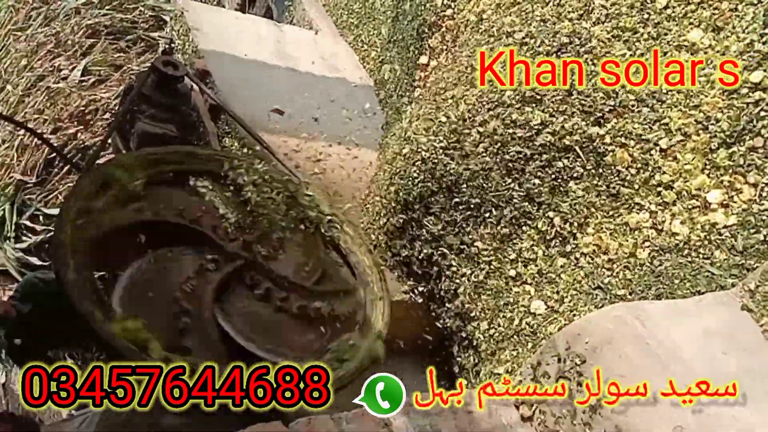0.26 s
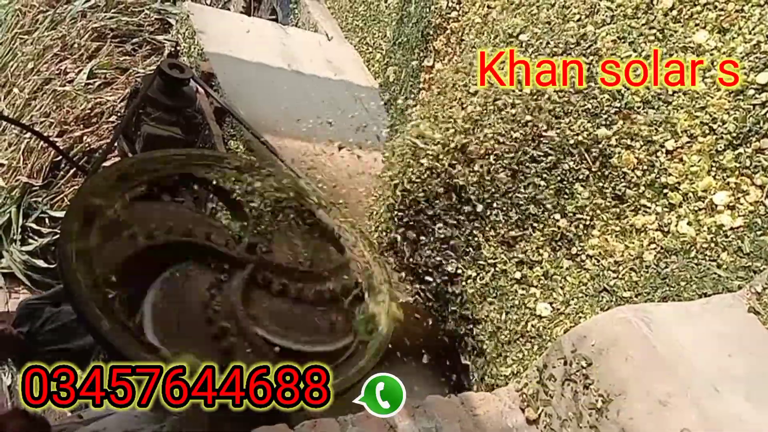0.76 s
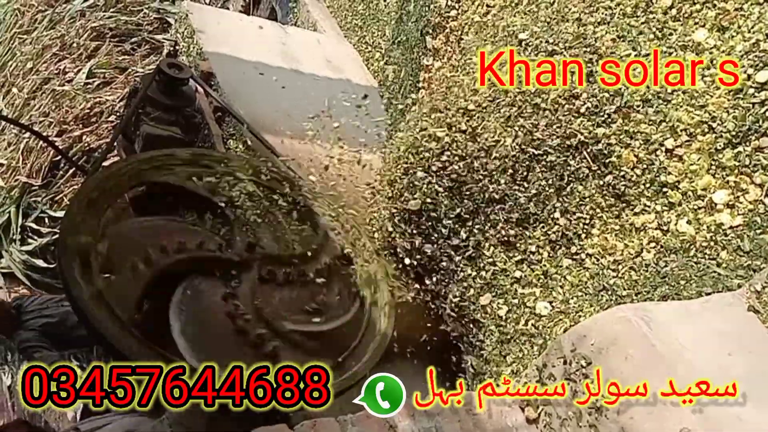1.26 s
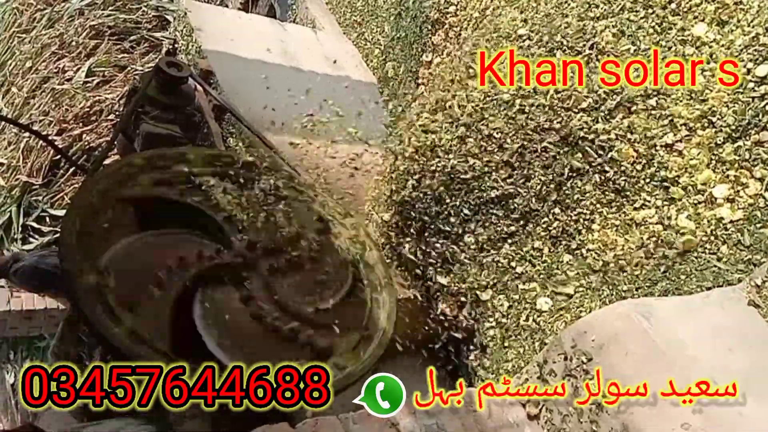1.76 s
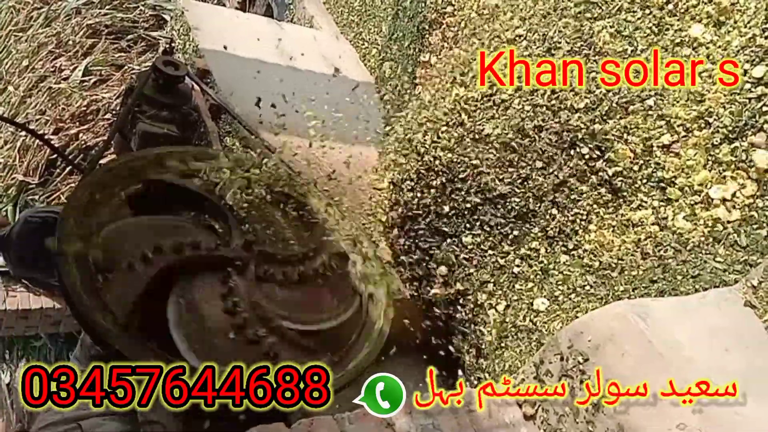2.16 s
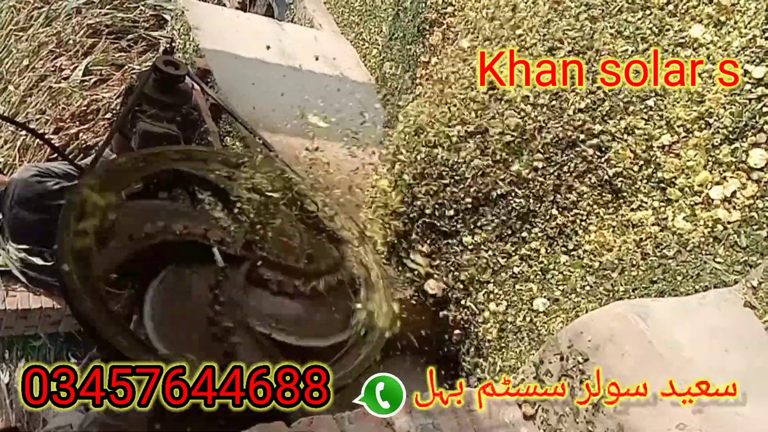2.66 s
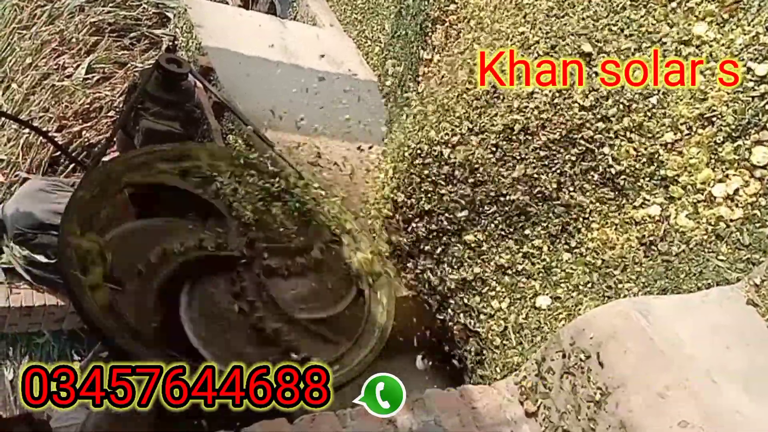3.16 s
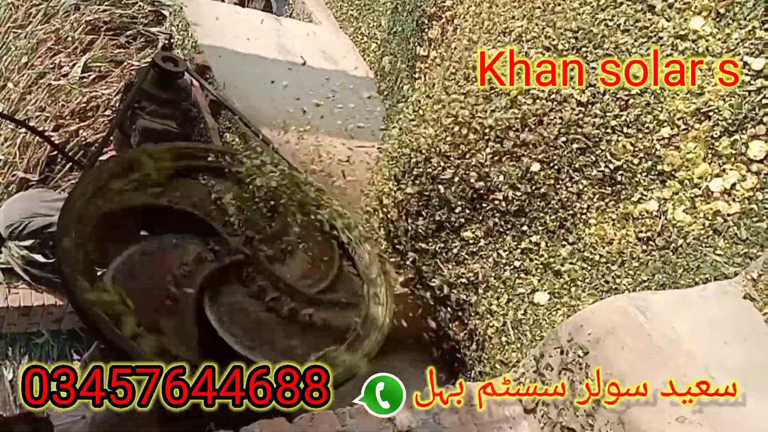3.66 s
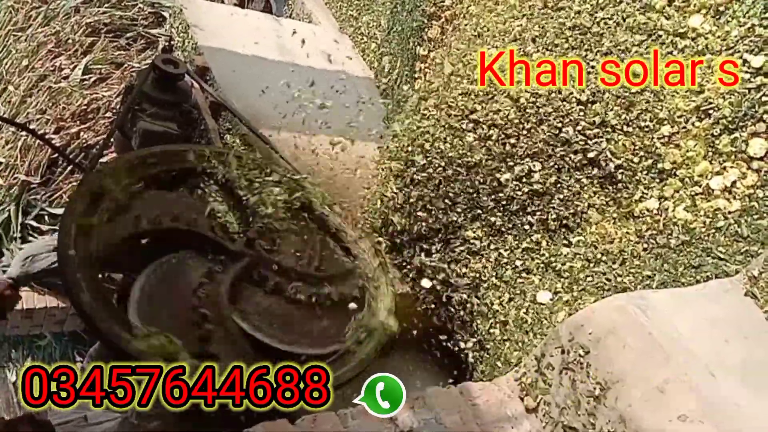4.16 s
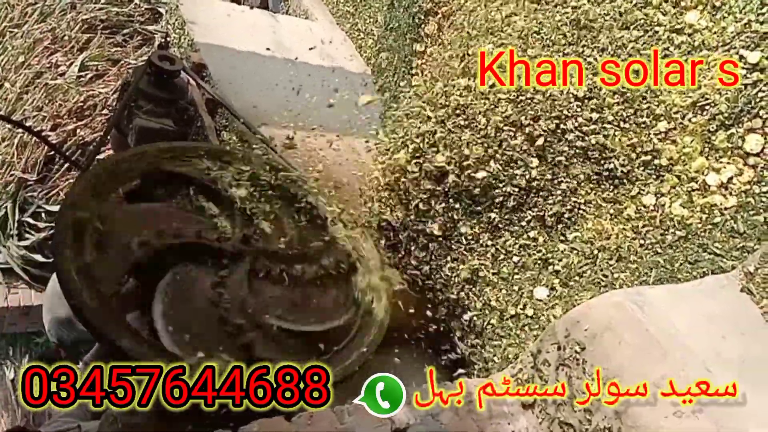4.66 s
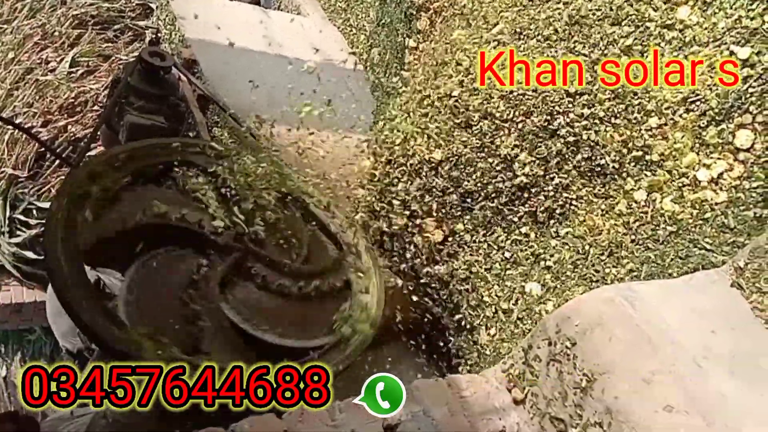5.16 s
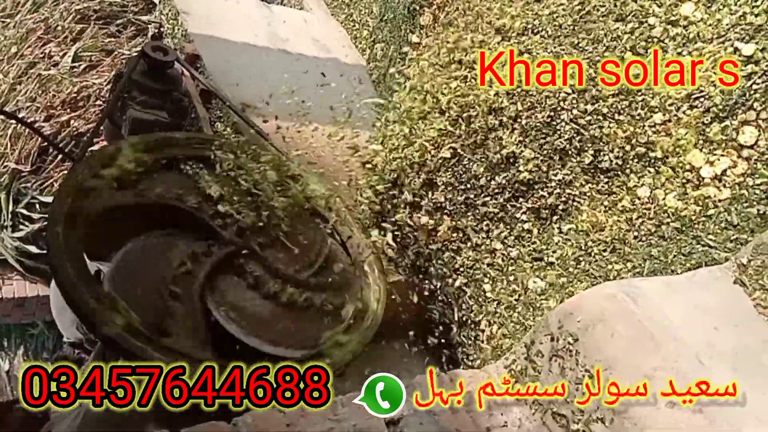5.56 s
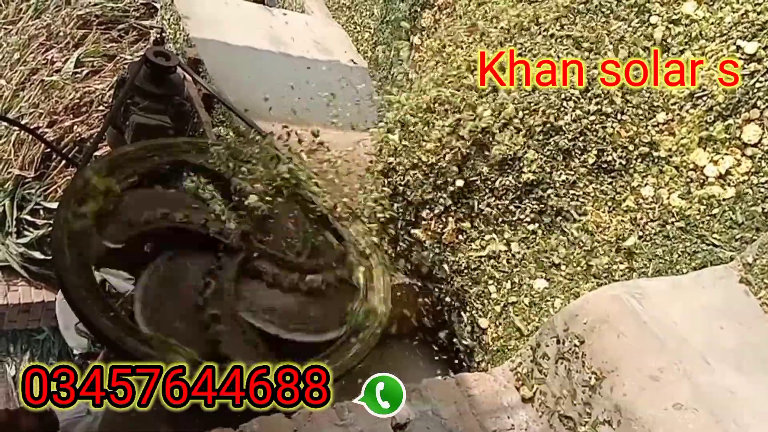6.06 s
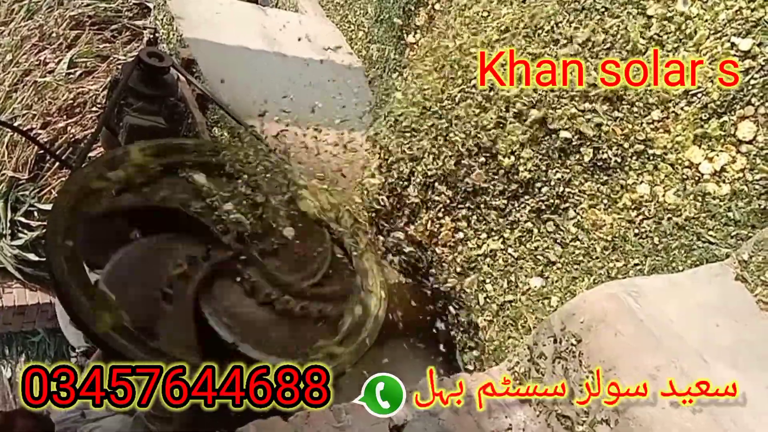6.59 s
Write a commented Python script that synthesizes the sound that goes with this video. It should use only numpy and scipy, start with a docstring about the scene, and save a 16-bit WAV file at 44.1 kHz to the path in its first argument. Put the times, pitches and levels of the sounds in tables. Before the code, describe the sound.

From 0 to about 6.8 seconds an electric chaff cutter runs without pause, heard from just above its flywheel in a farmyard. Four knives cut in turn, roughly fifteen strokes a second, making a fast chugging crunch: each stroke bites, tears through stalks with a bright hiss of leaves, then drops briefly. The strokes vary as the bundle packs tighter or looser, with fuller crunching around 1.4 to 2 seconds. Dull iron thumps cluster between 0.4 and 2 seconds, with isolated ones near 4 and 6.1. Thick stalks snap sharply around 1.3, 1.8, 2.3, 3.5, 4 and, most strongly, 6.2 seconds; small hollow pops flicker throughout. Underneath are steady low-mid rumble, loose gear rattle, pattering chips and a barely audible thin whine. Speed wavers only slightly. The cutting weakens at the very end, while the machine keeps running. Close, dry, compressed sound, with thinned bass.

```python
"""Chaff cutter in a farmyard

An electric chaff cutter chops green fodder, heard from just above its flywheel. Four knives shear the
bundle in turn, some fifteen cuts a second: fracture clicks, shaped by the force of each stroke, become
crunching stalks and hissing leaves; thick stems snap, hollow ones pop, and blows ring the modes of the
iron feed mouth. Chaff and loose gears patter over filtered noise and thin tones from the drive."""
import sys
import numpy as np
from scipy import signal
from scipy.fft import rfft, irfft, next_fast_len
from scipy.io import wavfile
from scipy.ndimage import uniform_filter1d

SR = 44100
rng = np.random.default_rng(int(sys.argv[2]) if len(sys.argv) > 2 else 0)


def inscribe(sig):
    """Save sig as 16-bit PCM at rate SR to the path in sys.argv[1].

    A 1-D sig is mono; a 2-D sig holds one channel per row.
    Samples are clipped to [-1, 1] before scaling.
    """
    pcm = np.round(np.clip(np.atleast_2d(sig).T, -1, 1) * 32767)
    wavfile.write(sys.argv[1], SR, pcm.astype(np.int16))


N = 301203
TIME = np.arange(N) / SR  # seconds
TOP_HZ = 15520  # cutoff of the final low-pass filter


def undb(db):
    """Logarithmic level: decibels to amplitude gain."""
    return 10 ** (np.asarray(db) / 20)


def unit(x):
    """Normalisation: scale to rms 1."""
    return x / np.sqrt(np.mean(x ** 2))


def add(out, s, x):
    """Superposition: mix x into out from time s in seconds."""
    i = max(0, int(s * SR))
    out[i:i + len(x)] += x[:max(0, N - i)]


def curves(table, at):
    """Linear interpolation: the columns of a curve table at the given times."""
    s, *columns = np.transpose(table)
    return np.array([np.interp(at, s, column) for column in columns])


def flutter(rate, depth_db):
    """Random amplitude modulation: a gain of rms 1 drifting to a new random level rate times a second."""
    levels = rng.standard_normal(N // 16)
    wander = np.interp(TIME * rate, np.arange(len(levels)), levels)
    return unit(undb(depth_db * wander))


def clicks(rate, spread_db):
    """Random impulse process: tiny fractures, rate a second, of either sign and uneven size, at rms 1."""
    happens = rng.random(N) < rate / SR
    size = undb(spread_db * np.clip(rng.standard_normal(N), -2, 2))
    return unit(happens * size * rng.choice([-1, 1], N))


# Rings of the steel knives and their guard.
# Each row: centre in Hz, width in Hz at half the lift, lift in dB.
STEEL_RINGS = [(900, 158, 6.5), (1408, 330, 8.5), (2095, 93, 7), (2590, 120, 6), (2990, 130, 3.5),
               (3563, 100, 3.5), (12800, 460, 3)]


def colour(x, points, rings, size=4096):
    """Minimum-phase filtering: a causal response of unit power from a spectrum with resonant humps."""
    hz = np.maximum(np.fft.rfftfreq(size, 1 / SR), 1)
    at, db = np.transpose(points)
    db = np.interp(np.log(hz), np.log(at), db)
    for centre, width, lift in rings:
        db = db + lift / (1 + (2 * (hz - centre) / width) ** 2)
    # folding the cepstrum onto positive time makes the filter causal
    cepstrum = irfft(np.log(undb(db)))
    cepstrum[1:size // 2] *= 2
    cepstrum[size // 2 + 1:] = 0
    response = np.exp(rfft(cepstrum))
    power = np.mean(np.abs(response) ** 2 * (hz < TOP_HZ))
    return signal.fftconvolve(x, irfft(response) / np.sqrt(power))[:N]


def ring(x, modes):
    """Modal synthesis: damped cosines, of unit energy together, excited by x."""
    t = TIME[:SR // 10]
    response = 0
    for hz, width, db in modes:
        # a narrower mode decays more slowly
        decay = np.exp(-np.pi * width * t)
        response = response + undb(db) * width * decay * np.cos(2 * np.pi * hz * t)
    return signal.fftconvolve(x, response / np.sqrt(np.sum(response ** 2)))[:N]


def dapple(x, rate, depth_db, count=9):
    """Independent band modulation: half-octave bands swell and fade on their own."""
    length = next_fast_len(N)
    spectrum = rfft(x, length)
    hz = np.maximum(np.fft.rfftfreq(length, 1 / SR), 1)
    place = np.clip(2 * np.log2(hz / 700), 0, count - 1)
    out = np.zeros(N)
    for k in range(count):
        share = np.maximum(0, 1 - np.abs(place - k))
        band = irfft(spectrum * share, length)[:N]
        out += band * flutter(rate, depth_db)
    return out


# Spectrum of belt, bearings and stirred air.
# Each row: frequency in Hz, relative level in dB per Hz.
DRIVE_SPECTRUM = [(22, -6), (58, -21), (90, -9.5), (145, -0.5), (200, -4.5), (400, 2), (750, -5.5),
                  (1400, -11), (3000, -26), (8000, -16.5)]
# Thin tones of the electric drive. Each row: frequency in Hz, rms level in dB.
WHINE_TONES = [(7806, -50.5), (7935, -50)]


def drive(load, steady_db=-38, loaded_db=-45):
    """Load-modulated noise: belt, bearings and air rumble harder during a cut; the motor whines faintly."""
    effort = undb(steady_db) + undb(loaded_db) * unit(load)
    noise = rng.standard_normal(N) * effort * flutter(rate=43, depth_db=1.0)
    rumble = colour(noise, DRIVE_SPECTRUM, STEEL_RINGS)
    whine = np.zeros(N)
    for hz, db in WHINE_TONES:
        tone = unit(np.sin(2 * np.pi * hz * TIME))
        whine += undb(db) * tone * flutter(rate=12, depth_db=2.5)
    return rumble + whine


# Spectrum of sliced leaves and skins, shared by the falling chips.
# Each row: frequency in Hz, relative level in dB per Hz.
HISS_SPECTRUM = [(600, -30), (2500, -17), (4200, -8), (4600, -1), (5100, 0), (5900, -3.3), (6750, -1.3),
                 (7700, -9.5), (9500, -15.7), (11600, -14.2), (13500, -9.2), (15350, -3.7)]


def falling_chaff(db=-31):
    """Random impacts: thrown chips of very uneven size patter on the guard and on the heap."""
    impacts = clicks(rate=7000, spread_db=10.0) * flutter(rate=18, depth_db=3.0)
    return undb(db) * colour(impacts, HISS_SPECTRUM, STEEL_RINGS)


# Spectrum of crushed stalks, shared by the gears. Each row: frequency in Hz, relative level in dB per Hz.
CRUNCH_SPECTRUM = [(250, -27), (700, -8.5), (1000, -1), (1500, 2), (2300, 2.5), (3200, 4), (4200, 0),
                   (6500, -7.5), (10000, -14)]


def gears(db=-32):
    """Repeated impact: the feed rollers and their loose gears rattle on between the cuts."""
    rattle = colour(clicks(rate=1200, spread_db=-0.5), CRUNCH_SPECTRUM, STEEL_RINGS)
    return undb(db) * dapple(rattle, rate=45, depth_db=3.5)


# Speed of the flywheel, which drifts a little over time. Each row: time in seconds, turns per minute.
WHEEL_SPEED = [(0.0, 229.7), (1.2, 231.3), (2.0, 229.0), (2.6, 229.1), (3.2, 225.9), (3.8, 229.7),
               (4.3, 230.6), (4.8, 229.5), (6.0, 228.9), (6.5, 233.2), (6.83, 230.1)]
FIRST_CUT_S = 0.017


def turns():
    """Integrated angular speed: turns of the flywheel since the first knife came round."""
    done = np.cumsum(curves(WHEEL_SPEED, TIME)[0]) / 60 / SR
    return done - np.interp(FIRST_CUT_S, TIME, done)


def scatter(x, t60, wet_db, count=4):
    """Diffuse reflection: dense short echoes whose pattern changes as the wheel turns."""
    t = TIME[:SR // 10]
    wet = 0
    for k in range(count):
        tail = rng.standard_normal(len(t)) * np.exp(-np.log(1000) * t / t60)
        facing = np.cos(np.pi * (2 * turns() + k / count))
        wet = wet + facing * signal.fftconvolve(x, tail / np.sqrt(np.sum(tail ** 2)))[:N]
    return x + undb(wet_db) * wet


# The four knives in turn, each set and worn differently; places run from 0 to 1 over a quarter turn.
# Each row: place of the bite, place of leaving, cutting level in dB at the bite, in mid-bundle and on
# leaving (before packing and scatter), knock in dB (before packing, scatter and the knock trim).
KNIFE_SETTINGS = [(0.2, 0.89, -18.5, -16, -21, -32.5), (0.19, 0.87, -16.5, -17, -24, -27),
                  (0.2, 0.87, -18.5, -16, -21, -27), (0.1714, 0.86, -17, -18.5, -27, -26)]
# How tightly the bundle is packed, as a lift of the cutting level.
# Each row: time in seconds, near side in dB, middle in dB, far side in dB.
BUNDLE_PACKING = [(0.0, 2.5, -2.5, 5), (0.5, 0.3, -0.2, 1.0), (0.85, 1.5, -1.2, -2.3), (1.4, 2.5, 1.1, 6.5),
                  (1.85, 5, 3, 2.5), (2.2, 0.7, 2, -3), (2.7, 0.5, -0.4, -5.5), (3.25, -3.1, -0.9, -2.5),
                  (3.75, -1.3, 0, 0.5), (4.05, 0.2, 2, 2), (4.6, 0, -1.6, 6.5), (5.1, -1.5, -1.3, 1.3),
                  (5.55, -1.7, -0.2, -2.7), (5.9, -0.6, 0.5, -4.5), (6.2, -0.8, 3, -0.5),
                  (6.8, -3, 3, -16.5)]
SCATTER_S, SCATTER_DB = 0.0014, 0.85  # standard deviations from cut to cut


def cuts():
    """Periodic excitation: one row per passing knife, of bite s, leaving s, levels dB, packing dB, knock dB."""
    passes = len(KNIFE_SETTINGS) * turns()
    rows = []
    for k, chance in enumerate(rng.standard_normal((int(passes[-1]), 5))):
        bite, leave, *levels_db, knock_db = KNIFE_SETTINGS[k % len(KNIFE_SETTINGS)]
        nominal_s = np.searchsorted(passes, [k + bite, k + leave]) / SR
        bite_s, leave_s = nominal_s + SCATTER_S * chance[:2]
        packing_db = curves(BUNDLE_PACKING, (bite_s + leave_s) / 2)
        levels_db = levels_db + packing_db + SCATTER_DB * chance[2:]
        rows.append((bite_s, leave_s, levels_db, packing_db[0], knock_db))
    return rows


ATTACK_S, RELEASE_S = 0.0086, 0.013  # the edge enters (at 0 dB packing) and clears the bundle
FIRM_DB = 5  # packing of the near side that halves the attack


def strokes(cutting):
    """Force envelope: each knife bites, passes through and leaves; a firm bundle is bitten sharply."""
    load = np.zeros(N)
    for bite_s, leave_s, levels_db, packing_db, _ in cutting:
        start = bite_s - ATTACK_S * .5 ** (packing_db / FIRM_DB)
        moments = [start, bite_s, (bite_s + leave_s) / 2, leave_s, leave_s + RELEASE_S]
        stroke = np.interp(start + TIME[:SR // 10], moments, [0, *undb(levels_db), 0])
        add(load, start, stroke)
    return load


KNOCK_HZ, KNOCK_SPREAD_HZ, KNOCK_SCATTER_DB = 432, 32, 3


def knocks(cutting, firmness=1.7):
    """Impact: every bite knocks the bundle on the shear plate, harder if packed; rows of s, level dB, Hz."""
    chance = rng.standard_normal((len(cutting), 2))
    blows = []
    for (s, _, _, packing_db, knock_db), (a, b) in zip(cutting, chance):
        level_db = knock_db + firmness * packing_db + KNOCK_SCATTER_DB * a
        blows.append((s, level_db, KNOCK_HZ + KNOCK_SPREAD_HZ * b))
    return blows


# Modes of the feed mouth and frame. Each row: frequency in Hz, width in Hz, relative peak level in dB.
MOUTH_MODES = [(149.6, 14, -12.5), (184, 9.9, -18.5), (264, 12, -5.5), (343.3, 10.4, 1), (397, 44, 6.5),
               (470, 53, 3.5), (515, 35, 3), (603.6, 8.8, 7), (674, 3.3, 5.5)]
# Single thumps of the bundle on the shear plate, of uneven strength.
# Each row: start in seconds, level in dB before the thump trim, main pitch in Hz.
SINGLE_THUMPS = [(0.42, -16, 380), (0.745, -17, 440), (0.832, -17, 530), (0.944, -13, 415),
                 (1.003, -23, 385), (1.368, -22, 538), (1.415, -13, 519), (1.657, -12, 466),
                 (1.786, -17, 447), (1.85, -14, 522), (1.916, -21, 396), (1.981, -14, 390),
                 (3.978, -15, 412), (6.111, -15, 398)]


def feed_mouth(force, bites, contact_s=0.0003, focus_hz=240, thump_db=-6.5, knock_db=-2, jolt_db=0, pull=.4):
    """Modal excitation: severed stalks jolt the frame; blows favour modes near their pitch and pull them."""
    push = np.exp(-TIME[:SR // 100] / contact_s)
    ringing = ring(clicks(rate=1100, spread_db=2) * force, MOUTH_MODES)
    jolts = unit(signal.fftconvolve(ringing, push)[:N])
    out = undb(jolt_db) * np.sqrt(np.mean(force ** 2)) * jolts
    for blows, gain_db in ((SINGLE_THUMPS, thump_db), (bites, knock_db)):
        for s, level_db, pitch in blows:
            shift = (pitch / KNOCK_HZ) ** pull
            modes = []
            for hz, width, db in MOUTH_MODES:
                loss_db = 10 * np.log10(1 + (2 * (hz - pitch) / focus_hz) ** 2)
                modes.append((hz * shift, width, db - loss_db))
            blow = ring(push, modes)
            # the level is that of the first few milliseconds
            add(out, s, undb(level_db + gain_db) * blow / np.std(blow[:SR // 150]))
    return out


POPS_PER_S, POP_DB, POP_SPREAD_DB = 110, 0, 1.5  # peak level over the crunch force
POP_LOW_HZ, POP_HIGH_HZ, POP_T60_S = 852, 5186, 0.052


def hollow_stems(force):
    """Cavity resonance: each hollow stem pops as it is opened and rings briefly at a pitch set by its bore."""
    out, t = np.zeros(N), TIME[:SR // 15]
    moments = np.flatnonzero(rng.random(N) < POPS_PER_S / SR)
    for i, (bore, size) in zip(moments, rng.random((len(moments), 2))):
        hz = POP_LOW_HZ * (POP_HIGH_HZ / POP_LOW_HZ) ** bore
        tone = np.sin(2 * np.pi * hz * t) * np.exp(-np.log(1000) * t / POP_T60_S)
        gain = undb(POP_DB + POP_SPREAD_DB * (2 * size - 1))
        add(out, i / SR, force[i] * gain * tone)
    return out


# The thickest stalks, which snap.
# Each row: start in seconds, level in dB before the trim and the breaking limit.
THICK_SNAPS = [(1.2753, -1), (1.5255, -9), (1.7845, 2), (2.2628, -1), (3.4565, 2), (4.0444, 0), (4.364, -3),
               (4.6207, -2), (6.1974, 7), (6.435, -5)]
SNAPS_PER_S, SNAP_DB = 4, 7.5  # lesser stalks; level over the cutting level, before the breaking limit


def snaps(load, db=-2, decay_s=0.0021, breaking_db=-7.5):
    """Brittle fracture: a thick stalk gives way in a burst of milliseconds; lesser ones break at random."""
    burst = np.zeros(N)
    dying = np.exp(-TIME[:SR // 20] / decay_s)
    for s, snap_db in THICK_SNAPS:
        add(burst, s, undb(snap_db + db) * dying)
    for i in np.flatnonzero(rng.random(N) < SNAPS_PER_S / SR):
        add(burst, i / SR, undb(SNAP_DB) * load[i] * dying)
    # no stalk bears more than its breaking force
    return np.minimum(burst, undb(breaking_db))


def leaves(force, db=-1.0):
    """Fine fracture noise: thin fibres part in a much denser, brighter spray of clicks than stalks."""
    fractures = clicks(rate=20000, spread_db=0.0) * flutter(rate=370, depth_db=1.5)
    return undb(db) * colour(fractures * force, HISS_SPECTRUM, STEEL_RINGS)


def stalks(force, db=-1.0):
    """Coarse fracture noise: woody cells collapse in bunches of clicks that ring the steel."""
    fractures = clicks(rate=7000, spread_db=2.5) * flutter(rate=200, depth_db=2.5)
    return undb(db) * colour(fractures * force, CRUNCH_SPECTRUM, STEEL_RINGS)


# How stalky the fodder is.
# Each row: time in seconds, crunch in dB and jolts of the frame in dB, both relative to the cutting level.
FODDER_FEED = [(0.0, -7.5, -10.5), (0.85, -5, -8), (1.5, -7.5, -11.5), (2.4, -6, -12.5), (3.5, -5.5, -10),
               (4.4, -6.5, -12.7), (5.2, -6.7, -11.9), (6.8, -8, -11.3)]


def scene():
    """Common excitation: the strokes drive the crunch, the hiss, the frame and the rumble together."""
    crunch, jolts = undb(curves(FODDER_FEED, TIME))
    passes = cuts()
    load = strokes(passes)
    # the force is uneven as the edge passes from stalk to stalk
    force = load * flutter(rate=370, depth_db=1.0)
    tearing = np.hypot(force, snaps(load))
    torn = stalks(tearing * crunch) + leaves(tearing)
    fodder = dapple(torn, rate=60, depth_db=2.5) + hollow_stems(tearing * crunch)
    cutting = fodder + feed_mouth(force * jolts, knocks(passes))
    reflected = scatter(cutting, t60=0.053, wet_db=-17.0)
    return (reflected + gears() + falling_chaff() + drive(load))[None]


def record(dry, bass_hz=75, ceiling_db=-10):
    """Compression and band limiting: loud crunches are held down, the bass thinned, the top treble cut."""
    loudness = np.sqrt(np.abs(uniform_filter1d(dry ** 2, SR // 400)))
    gain = (1 + (loudness / undb(ceiling_db)) ** 4) ** -.25
    held = dry * uniform_filter1d(gain, SR // 400)
    thin = signal.sosfilt(signal.butter(2, bass_hz, "high", fs=SR, output="sos"), held)
    return signal.sosfilt(signal.ellip(14, .2, 80, TOP_HZ, fs=SR, output="sos"), thin)


dry = scene()
out = record(dry)
inscribe(out)
```